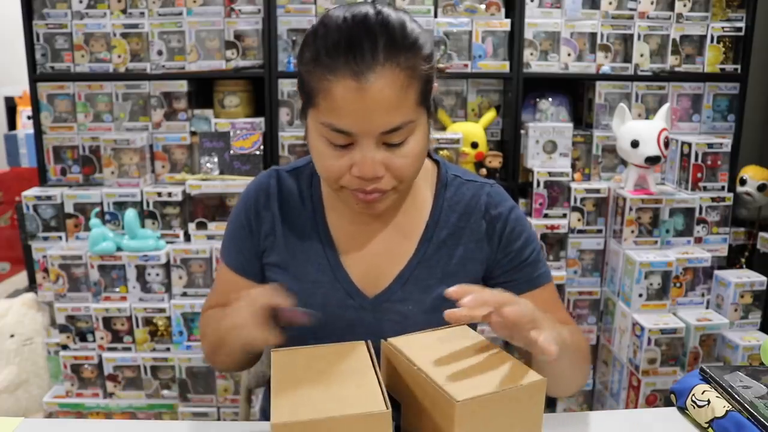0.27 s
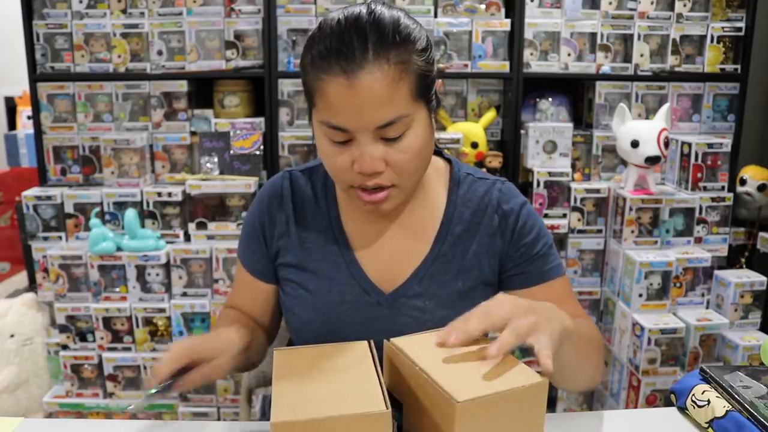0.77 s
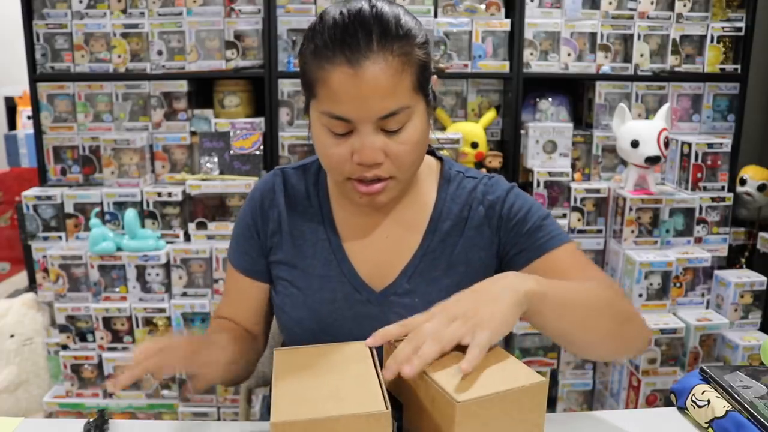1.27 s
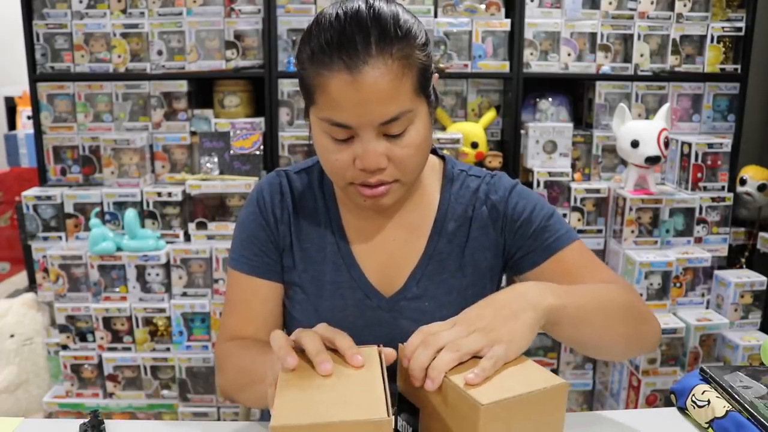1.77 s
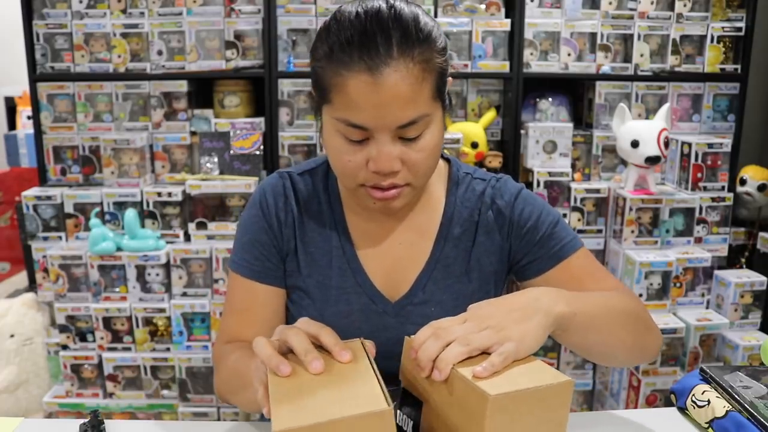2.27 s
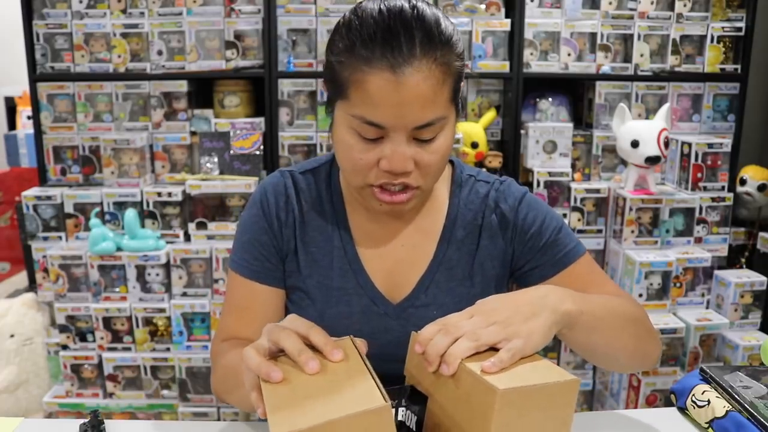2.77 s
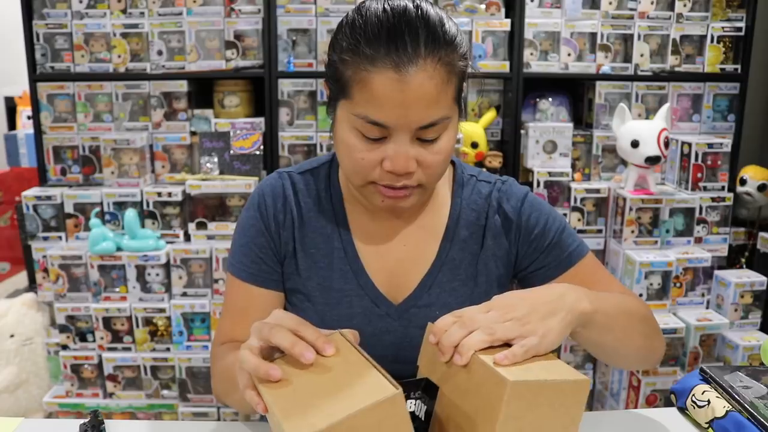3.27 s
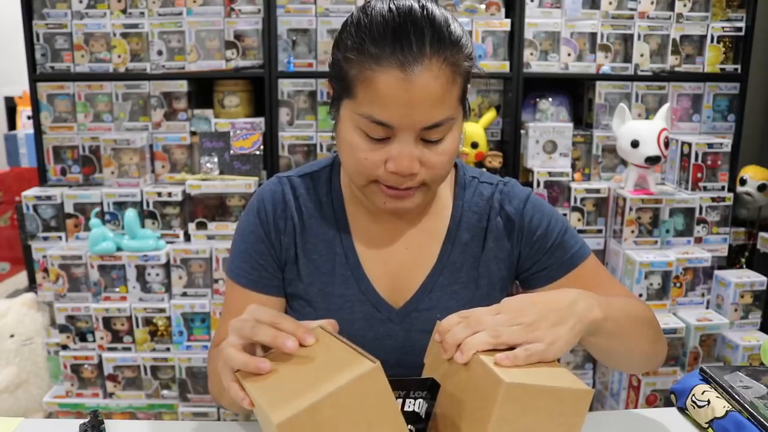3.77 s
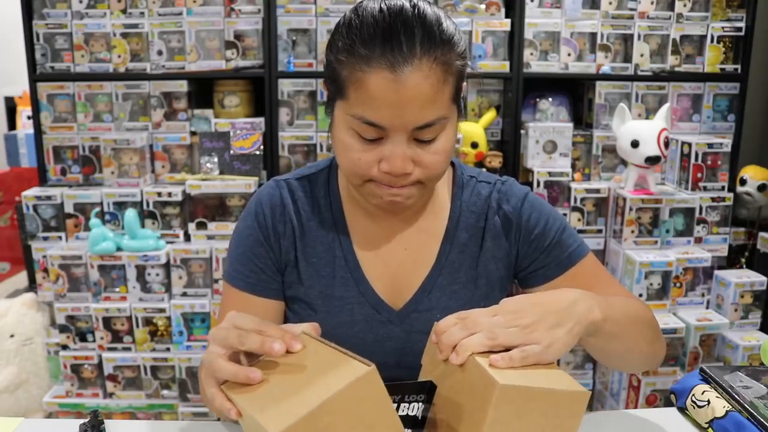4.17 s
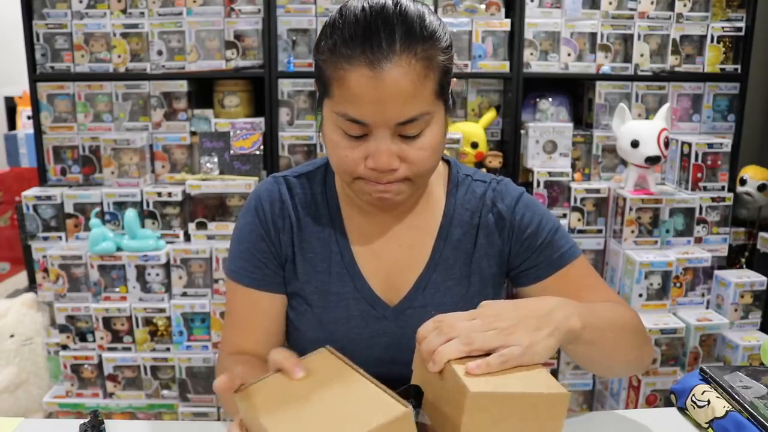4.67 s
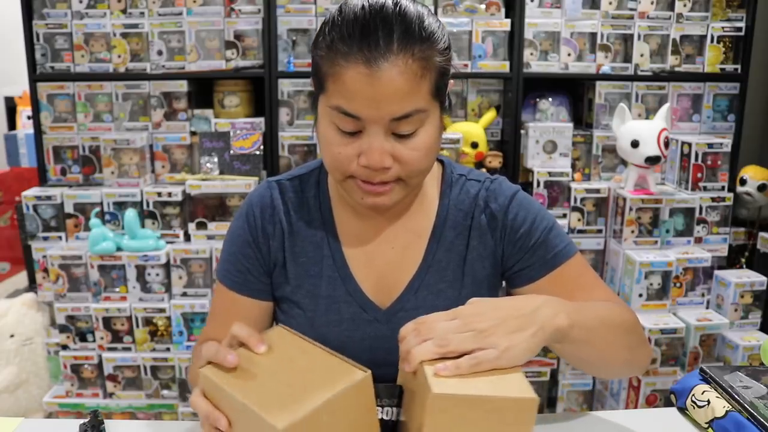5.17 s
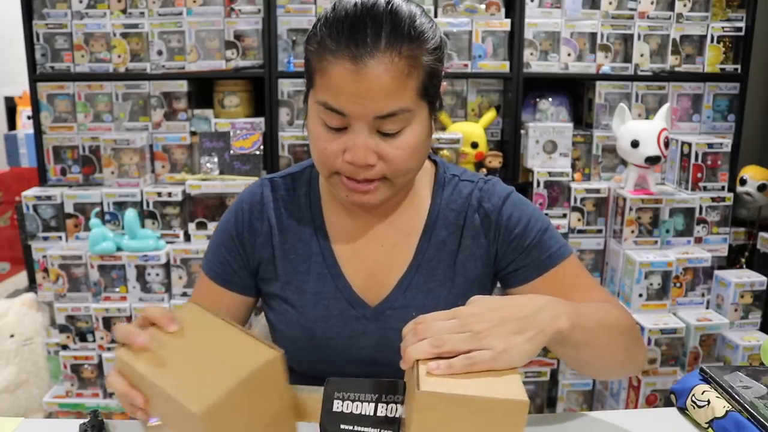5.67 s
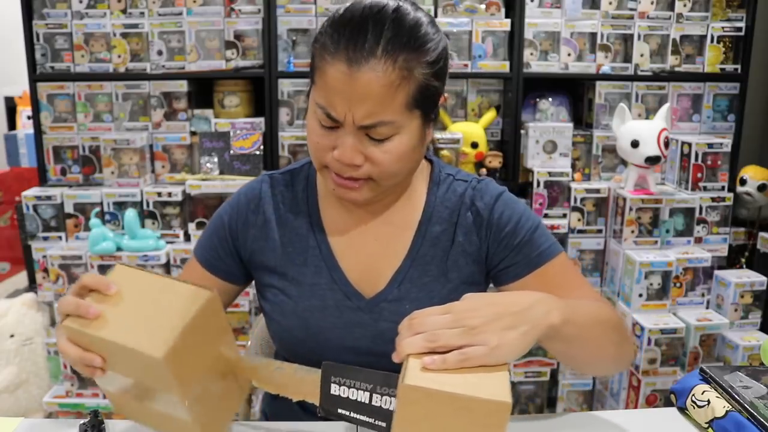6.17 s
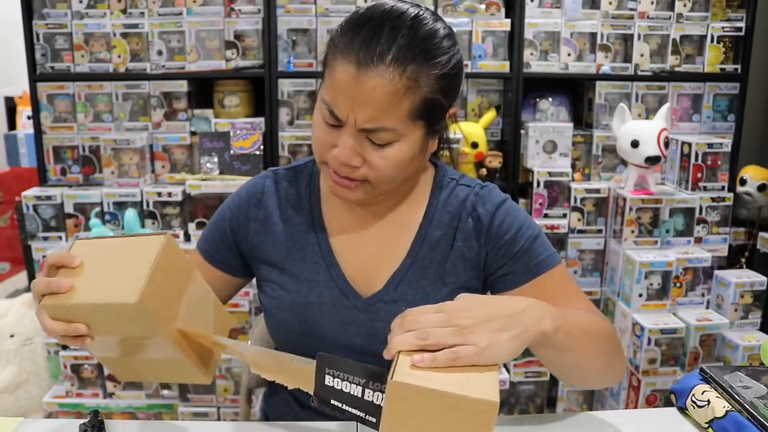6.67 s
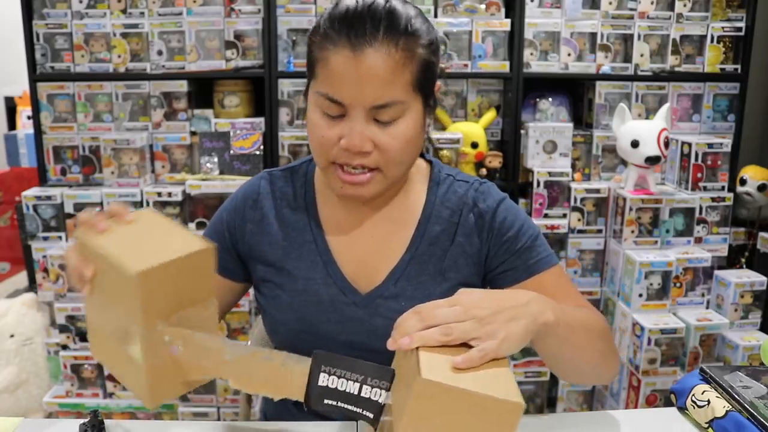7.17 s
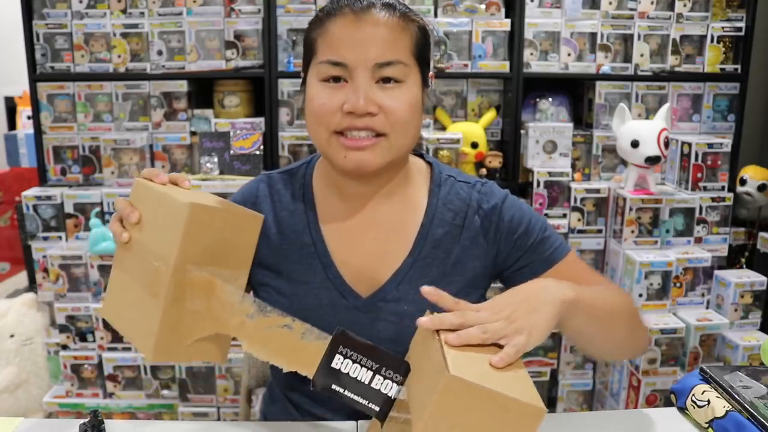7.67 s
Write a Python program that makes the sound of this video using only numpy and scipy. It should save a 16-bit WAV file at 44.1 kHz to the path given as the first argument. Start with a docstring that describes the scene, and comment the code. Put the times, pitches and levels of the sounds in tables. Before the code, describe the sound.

Close, dry indoor sound of taped boxes being separated: quiet touches and taps, a cluster of strong hollow cardboard thumps, a long uneven sticky peel full of bright pops, a short pause with knocks, then a much louder continuous rip of tape and paper fibres. It ends in light scuffs and a small click over low hiss.

```python
"""In a small furnished room, two cardboard boxes are handled on a table and pulled apart.
The packing tape between them peels and tears paper fibres in dense, tiny slips, made as coloured random pulses.
Loud snaps of glue add short twangs with clicks, and brief rasps are tones that wander and swell.
Box knocks are fading sine tones with a crack of noise. One microphone hears it all, with a steady hiss."""
import sys
import numpy as np
from scipy import signal
from scipy.fft import rfft, irfft, next_fast_len
from scipy.io import wavfile
from scipy.ndimage import uniform_filter1d, map_coordinates

SR = 44100
rng = np.random.default_rng(int(sys.argv[2]) if len(sys.argv) > 2 else 0)


def int16_out(signal):
    """Quantize to a 16-bit WAV file."""
    q = np.round(np.clip(np.atleast_2d(signal).T, -1, 1) * 32767)
    wavfile.write(sys.argv[1], SR, q.astype(np.int16))


N = 349713  # length in samples

# how hard the tape peels, in two long pulls: rows of (t/s, tape level/dB)
PULLS = [
    [(1.762, -62), (1.779, -38), (1.866, -39.5), (1.955, -31.5), (2.07, -43.5), (2.28, -27.5), (2.37, -50),
     (2.393, -42), (2.417, -52), (2.43, -41), (2.468, -30), (2.54, -35.5), (2.575, -29.5), (2.65, -33.5),
     (2.73, -37.5), (2.81, -31.5), (2.93, -28.5), (3.08, -35.5), (3.385, -26), (3.45, -28.5), (3.53, -39),
     (3.59, -30), (3.625, -33), (3.74, -28.5), (3.86, -33.5), (4.12, -30.5), (4.17, -32.5), (4.2, -28.5),
     (4.33, -36.5), (4.42, -39), (4.48, -53)],
    [(4.78, -44), (4.83, -35), (4.86, -29), (4.9, -25.5), (4.975, -33), (5.035, -27), (5.125, -42.5),
     (5.18, -30), (5.355, -31), (5.385, -19), (5.43, -18), (5.49, -23), (5.575, -34), (5.655, -23),
     (5.74, -19.5), (5.8, -21.5), (5.91, -21), (5.975, -26), (6.02, -21.5), (6.17, -19), (6.27, -21.5),
     (6.38, -20), (6.43, -24), (6.5, -20.5), (6.55, -35), (6.605, -38), (6.645, -55.5), (6.72, -70),
     (6.92, -86)],
]
# colour of the vibrating tape: (f/Hz, gain/dB)
TAPE_COLOUR = [(700, -45), (1300, -16), (1600, -1), (2600, 0.5), (3500, -1.5), (4200, -0.5), (5500, -3.5),
               (6400, -12), (7500, -16), (11000, -58)]
# colour of the tearing paper fibres: (f/Hz, gain/dB)
FIBRE_COLOUR = [(150, -65), (4000, -22.5), (5800, 4.5), (6800, 7), (8800, 6), (10500, -2), (11800, 2.5),
                (14000, 1.5), (16000, -8.5)]


def amp(db):
    """Turn a level in dB into a gain."""
    return 10 ** (np.asarray(db) / 20)


def unit(x):
    """Scale x to an average strength (rms) of 1."""
    return x / np.sqrt(np.mean(x ** 2) + 1e-20)


def along(points, hz):
    """Read a curve of (f/Hz, value) points at any frequency, on a log axis."""
    point_hz, values = np.transpose(points)
    return np.interp(np.log(hz + 1), np.log(point_hz + 1), values)


def curves(rows):
    """Turn rows of (t/s, values...) into one value per sample for each column after the time."""
    times, *columns = np.transpose(rows)
    return [np.interp(np.arange(N) / SR, times, column) for column in columns]


def wobble(rate):
    """Draw a smooth random curve with this many random points a second."""
    points = rng.standard_normal(int(N * rate / SR) + 4)
    return map_coordinates(points, [np.arange(N) * rate / SR])


def coloured(x, spectrum, size=4096):
    """Filter x to this spectrum without any sound ahead of a pulse, so that every slip starts sharply."""
    gain = amp(along(spectrum, np.fft.rfftfreq(size, 1 / SR)))
    cepstrum = irfft(np.log(gain + 1e-6))
    # folding the second half onto the first gives the filter its sharp start (minimum phase)
    cepstrum[1:size // 2] *= 2
    cepstrum[size // 2 + 1:] = 0
    pulse_response = irfft(np.exp(rfft(cepstrum)))
    return signal.oaconvolve(x, pulse_response)[:N]


def patchy(x, depth_db, bins=4, frames=14, lift_db=0):
    """Vary the gain in random patches of time and frequency: the vibrating area keeps changing."""
    z = signal.stft(x, nperseg=512)[2]
    field = uniform_filter1d(rng.standard_normal(z.shape), int(bins), 0)
    field = uniform_filter1d(field, int(frames), 1)
    patch_gain = amp(depth_db * unit(field) + lift_db)
    return signal.istft(z * patch_gain, nperseg=512)[1][:N]


def slips(rate, spread_db, clump_db, smooth_db):
    """Tiny releases (rate a second) at random moments, a few larger, in clumps, on a smooth rubbing."""
    when = rng.random(N) < rate / SR
    larger = np.minimum(rng.exponential(size=N), 2.8)
    size = amp(spread_db * larger) * rng.standard_normal(N)
    clumps = amp(clump_db * (0.97 * wobble(300) + 0.6 * wobble(90)))
    rubbing = amp(smooth_db) * rng.standard_normal(N)
    return unit(clumps * (unit(when * size) + rubbing))


def background_hiss():
    """Steady noise of the microphone, coloured and set to a fixed level."""
    # colour of the hiss: (f/Hz, relative level/dB)
    hiss_colour = [(24, -52.5), (40, -16), (144, 5.5), (185, 4), (305, -6), (412, -18.5), (1270, -21.5),
                   (5720, -21), (14800, -27.5), (16000, -33.5)]
    hiss_db = -73
    return amp(hiss_db) * unit(coloured(rng.standard_normal(N), hiss_colour))


def room(x):
    """The room answers with a tail of noise in which each frequency dies at its own speed."""
    # how long the room rings: (f/Hz, time to fall by 60 dB/s)
    ring_times = [(150, 0.28), (1000, 0.1), (4000, 0.083), (12000, 0.043)]
    hz, t, z = signal.stft(rng.standard_normal(SR // 2), SR, nperseg=256)
    fade = amp(-60 * t / along(ring_times, hz)[:, None])
    tail = signal.istft(z * fade, SR, nperseg=256)[1]
    delayed = np.pad(x, (250, 0))  # samples before the answer starts
    return signal.fftconvolve(delayed, tail / np.linalg.norm(tail))[:N]


def rasps():
    """One patch of tape or board sings: a tone wanders at random in pitch, swelling and fading."""
    # short rasps: (centre t/s, length/s, level at the centre/dB, tone f/Hz, width before smoothing/Hz)
    rasp_list = [(1.826, .012, -28, 3100, 500), (1.828, .012, -28, 950, 300), (1.945, .06, -32, 2700, 1000),
                 (4.697, .01, -33, 3500, 400), (4.708, .01, -36, 3600, 300), (4.795, .02, -38, 3300, 500),
                 (4.815, .025, -35, 3600, 300), (6.985, .005, -40, 1650, 300),
                 (6.988, .008, -48, 2700, 400), (7.04, .05, -55, 1650, 150), (7.497, .07, -41, 450, 200),
                 (7.715, .025, -36, 330, 150), (7.79, .1, -46, 1080, 200), (7.8, .1, -42, 420, 80),
                 (7.906, .025, -43, 2500, 200)]
    out = np.zeros(N + SR)
    t = np.arange(-SR // 8, SR // 8) / SR
    for centre, length, db, tone_hz, width_hz in rasp_list:
        phase_step = np.sqrt(2 * np.pi * abs(width_hz) / SR)
        wander = np.cumsum(rng.normal(0, phase_step, len(t)))
        wander = uniform_filter1d(wander, size=70)
        swell = np.exp(-4 * (t / length) ** 2)
        tone = np.sin(2 * np.pi * tone_hz * t + wander)
        out[round(centre * SR) - SR // 8:][:len(t)] += amp(db + 3) * swell * tone  # a sine peaks 3 dB above its rms
    return out[:N]


def knocks():
    """Each blow rings the box modes near its struck tone most, with a short crack of the edge on top."""
    # knocks: (t/s, ring level/dB, centre of struck tone f/Hz, crack relative to ring/dB, share of the free ring time)
    blows = [(0.495, -26, 434, -14, 1), (0.539, -25.5, 245, -1, 1), (0.603, -31, 200, -21, 1),
             (0.719, -29, 250, -9.5, 1), (1.064, -40, 710, 0.4, 1.1), (1.186, -15.5, 420, -2.5, 1.1),
             (1.231, -5, 600, -8, .7), (1.243, -5, 280, -27, 1.1), (1.299, -6, 480, -11, .8),
             (1.361, -17.5, 160, -24, 1.3), (1.529, -22, 550, -14, .8), (1.552, -18, 300, -8, 1.1),
             (3.397, -7, 420, -9, .5), (4.38, -18, 300, -2, 1.1), (4.58, -5.5, 320, -11, .7),
             (4.634, -13.5, 1000, -14, 1.3), (4.74, -22, 450, -12, .9), (4.746, -10, 600, 0, .7),
             (4.841, -10, 600, 1, .8), (4.881, -8, 696, -10, .6), (5.13, -13, 450, -14, .9),
             (5.162, -19, 342, -8, .9), (5.29, -21, 400, -10, .9), (5.597, -8.5, 314, -3, .9),
             (7.015, -52, 400, -15, .9), (7.587, -35.5, 331, 6, .9)]
    # ringing modes of a free box: (f/Hz, relative level/dB, time to fall by 60 dB/s)
    box_modes = [(150, 2, 0.09), (235, 4, 0.051), (343, 7.5, 0.033), (396, -3, .04), (522, 4, 0.032),
                 (717, 6.5, .028), (840, 6, 0.024), (970, 13, 0.011), (1200, 6, 0.022), (1550, 6.5, 0.015),
                 (1950, 13.5, 0.02), (3100, -2.5, .015)]
    # colour of the cracking board edge: (f/Hz, gain/dB)
    crack_colour = [(500, -30), (1200, -1.5), (2000, -6.5), (3300, -1), (4400, -17), (8000, -38),
                    (16000, -58)]
    # a small box sends out little deep bass: (f/Hz, gain/dB)
    box_radiation = [(40, -22), (120, 0), (20000, 0)]
    rings, cracks = np.zeros((2, N + SR))
    t = np.arange(SR // 5) / SR
    hz, level, t60 = np.transpose(box_modes)[:, :, None]
    for start, db, tone_hz, crack_db, free in blows:
        here = slice(round(start * SR), round(start * SR) + len(t))
        detune = rng.normal(1, .05, hz.shape)  # the grip shifts the modes
        near_db = -12 * np.abs(np.log2(hz / tone_hz))  # 12 dB weaker per octave away
        uneven_db = rng.normal(0, 1.6, hz.shape)
        strength = amp(level + near_db + uneven_db - 60 * t / (abs(free) * t60))
        ring = np.sum(strength * np.sin(2 * np.pi * hz * detune * t), 0)
        ring = ring * (1 - np.exp(-1.5 * tone_hz * t))  # a dull blow builds slower
        rings[here] += amp(db) * ring / np.abs(ring).max()
        cracks[here] += amp(db + crack_db - 60 * t / .018) * rng.standard_normal(len(t))
    return coloured(rings, box_radiation) + amp(7.5) * coloured(cracks, crack_colour)


def snaps():
    """A big release of glue: a treble click, a burst in the colour of the tape and its short twang."""
    # single loud snaps: (t/s, relative level/dB, twang f/Hz, click relative to the snap/dB)
    snap_list = [(0.248, -47, 2700, -35), (0.4943, -23.5, 2840, -23), (0.5426, -22, 1810, -12),
                 (1.345, -28, 5300, -22), (1.5284, -28, 2930, -36), (1.826, -24, 3200, -5),
                 (1.9006, -21, 4200, -1), (1.9387, -6, 2640, -12), (2.151, -15, 1760, -12),
                 (2.4224, -22, 1730, -10), (2.4548, -16.5, 2200, -21), (2.7087, -17, 1780, -11),
                 (2.9188, -13, 5230, -14.5), (3.057, -15, 5330, -11), (3.1796, -10, 5460, -19),
                 (3.325, -13, 5500, -14), (3.3734, -11, 5040, -14), (3.4176, -5, 4730, -6.5),
                 (3.6347, -10, 4670, -19.5), (3.895, -11, 6000, -32), (3.906, -14, 5900, -20),
                 (3.9444, -9.5, 5880, -21.5), (4.0442, -16, 5930, -18), (4.067, -14, 6000, -15),
                 (4.147, -13, 3000, -16), (4.1659, -12, 1670, -9), (4.1815, -10, 3200, -8),
                 (4.247, -16, 5800, -14), (4.331, -24, 5000, -3), (4.3548, -24, 5000, -1),
                 (4.9916, -7, 2570, -16), (5.5523, -14, 2640, -14), (6.501, -4.5, 5250, -21.5),
                 (6.9837, -33, 5200, -45), (7.5567, -36, 2720, -40), (7.5795, -14, 2950, -40),
                 (7.5887, -21, 2970, -34)]
    twangs, bursts, clicks = np.zeros((3, N + SR))
    t = np.arange(SR // 40) / SR
    for start, db, tone_hz, click_db in snap_list:
        here = slice(round(start * SR), round(start * SR) + len(t))
        clicks[here] += amp(db + click_db - 60 * t / .009) * rng.standard_normal(len(t))
        flutter = np.cumsum(rng.normal(0, 0.11, len(t)))  # the tone is unsteady
        twang = 0.42 * amp(-60 * t / 0.013) * np.sin(2 * np.pi * tone_hz * t + flutter)
        twangs[here] += amp(db) * twang
        bursts[here] += amp(db - 60 * t / 0.0083) * rng.standard_normal(len(t))
    burst_sound = amp(-4.5) * coloured(bursts, TAPE_COLOUR)
    click_sound = amp(1.5) * coloured(clicks, FIBRE_COLOUR)
    return twangs[:N] + burst_sound + click_sound


def stretch_db(width_hz=380):
    """The free length of tape rings as it is stretched: a lift in dB around three moving tones."""
    # the moving tones: (t/s, low f/Hz, lift/dB, middle f/Hz, lift/dB, high f/Hz, lift/dB)
    moving_tones = [(.3, 2300, 3, 3800, 0.5, 5740, 4), (1.6, 1950, 1.5, 3600, 6, 5600, 0.5),
                    (1.8, 3220, 5, 4400, -0.5, 5700, 4), (1.95, 2570, 8, 4400, -6.5, 6000, 1.5),
                    (2.1, 1860, 8, 4500, -8, 5730, 2.5), (2.35, 1830, 8, 3900, 11, 5600, -1.5),
                    (2.55, 2170, 7, 3970, 2.5, 5400, 1.5), (2.85, 1800, 3, 4030, 3, 5270, 9),
                    (3.3, 1700, 5, 4320, 4, 5480, 8), (3.7, 1700, 0.4, 3300, 3, 5600, 4),
                    (3.95, 1700, 1.5, 3150, 2.5, 5900, 12), (4.28, 1700, 1.5, 3020, 2.5, 5700, 4),
                    (4.38, 1800, -2.5, 3100, 3.5, 4900, 13), (4.7, 2100, 6, 3700, 6, 5100, -1.5),
                    (5.2, 2370, 1.5, 3800, 0.4, 5400, 9), (5.6, 2700, 7, 4080, 5, 5400, -1.5),
                    (5.9, 1910, 8, 4600, 4, 5900, 3), (6.2, 2000, 2.5, 4300, 8, 5400, 5),
                    (6.5, 2120, 5, 4300, -1.5, 5510, 4), (7, 1650, 12, 2700, 6.5, 5480, -1.5),
                    (7.3, 1850, 10, 2630, 4.5, 5440, 3), (7.93, 1650, 4, 2670, 4, 5500, 8)]
    hz, t, _ = signal.stft(np.zeros(N), SR, nperseg=512)
    times, *columns = np.transpose(moving_tones)
    columns = [np.interp(t, times, column) for column in columns]
    lift = 0
    for tone, db in zip(columns[::2], columns[1::2]):
        lift = lift + db * np.exp(-((hz[:, None] - tone) / width_hz) ** 2)
    return lift


def efforts():
    """Gains of tape, fibres, walls and flaps: the pulls, and the touches that rise, hold and fall."""
    # how the peeling spreads, relative to the tape at full pull: (t/s, fibres/dB, walls/dB, flaps/dB)
    spread = [(1.76, -3.5, 0.5, -12.5), (1.85, -9.5, -6.5, -10.5), (1.96, -5.5, -9.0, -16.0),
              (2.05, -10.0, 1.5, -11), (2.2, -3.5, -12.0, -8.0), (2.33, -7.0, -1.5, -7.5),
              (2.47, -3.0, -16.5, -9.0), (2.62, -7.5, -15.0, -5.0), (2.75, -6.0, -20.5, -7.5),
              (2.89, -3.5, -7.5, -8.0), (3.15, -3.5, -9.0, -5.0), (3.4, -4.0, -13.0, -5.0),
              (3.53, -12, -1.0, -3.0), (3.7, -8.5, -11.5, -5), (3.85, -10.0, -6.5, -2.5),
              (4.05, -7.5, -12.0, -5.0), (4.2, -7.5, -10, -3.5), (4.32, -7.5, -9.5, -4.5),
              (4.45, -7.5, 2.5, -2.0), (4.8, -9.5, 4.5, -0.5), (4.9, -6.0, -5.0, -8.5),
              (5.05, -5.0, -6.0, -2.0), (5.3, -15.5, -6.5, -5.5), (5.4, -7.0, 1.0, -1.5),
              (5.55, -11.0, -5.0, 1.0), (5.64, -6.0, -1, -4), (5.75, -8.0, 0, -5.5),
              (5.95, -6.0, -5.5, -6.0), (6.05, -4.5, 4.0, -0.5), (6.14, -9.5, -2.5, -7.5),
              (6.25, -9.0, -5.0, -7.0), (6.4, -11.5, -6.5, -5.5), (6.5, -17.5, -7.5, -7.0),
              (6.62, -9.5, -8.5, -5.5), (6.75, -10.5, -7.0, -2.5)]
    # short touches of hands, tape and boxes: (peak t/s, rise/s per 20 dB, hold/s, fall/s per 20 dB,
    # tape level/dB, fibres level/dB, walls level/dB, flaps level/dB)
    touches = [(0, .01, .001, .08, -40, -47, -54, -55), (.06, .08, .001, .13, -70, -80, -55, -57),
               (.2, .1, .05, .3, -70, -84, -80, -73), (.3, .1, .75, .3, -76, -82, -90, -79),
               (.5, .012, .04, .05, -41, -48, -44, -40), (.61, .012, .005, .1, -46, -56, -46, -56),
               (.65, .04, .17, .042, -44, -55, -58, -68), (.737, .055, .03, .06, -44, -46, -40, -49),
               (1.066, .008, .014, .1, -54, -79, -51, -55), (1.119, .045, .005, .08, -45, -72, -62, -49),
               (1.19, .012, .005, .07, -27, -54, -26, -28), (1.253, .05, .003, .035, -29, -52, -34, -31),
               (1.302, .012, .003, .1, -32, -64, -31, -32), (1.37, .1, .04, .1, -52, -75, -31, -42),
               (1.46, .05, .02, .03, -45, -48, -46, -65), (1.552, .011, .03, .085, -31, -39, -31, -34),
               (1.62, .05, .025, .04, -39, -44, -44, -45), (1.695, .03, .01, .06, -75, -85, -48, -72),
               (1.76, .03, .03, .1, -75, -85, -46, -72), (4.555, .15, .1, .06, -49, -52, -52, -50),
               (4.636, .012, .003, .12, -40, -50, -50, -39), (4.693, .06, .003, .05, -48, -55, -33, -38),
               (4.748, .01, .005, .08, -39, -60, -32, -34), (6.99, .01, .003, .3, -61, -95, -75, -72),
               (7.088, .035, .003, .3, -38, -53, -50, -50), (7.142, .06, .03, .05, -40, -50, -30, -39),
               (7.23, .1, .09, .13, -41, -51, -58, -50), (7.33, .1, .08, .09, -47, -70, -47, -60),
               (7.49, .06, .02, .045, -70, -80, -50, -60), (7.582, .006, .003, .06, -41.5, -66, -52, -58),
               (7.61, .03, .003, .2, -60, -75, -45, -58), (7.663, .05, .04, .15, -41, -47, -44, -66),
               (7.722, .04, .003, .1, -46, -56, -43, -58), (7.78, .1, .055, .025, -45, -62, -45, -58),
               (7.9, .025, .003, .07, -44, -48, -75, -80)]
    full_db = -22  # tape level at full pull
    others_grow = 1.1  # dB that fibres and board gain for each dB of pull
    t, power = np.arange(N) / SR, np.zeros((4, N))
    spread_db = curves(spread)
    for rows in PULLS:
        short_db = curves(rows)[0] - full_db  # pull relative to full pull
        layers_db = [short_db] + [others_grow * short_db + db for db in spread_db]
        active = (t > rows[0][0]) * (t < rows[-1][0])
        power += amp(full_db + np.array(layers_db)) ** 2 * active
    for peak, rise, hold, fall, *peak_db in touches:
        near = slice(max(0, round((peak - .3) * SR)), round((peak + hold + .8) * SR))
        before = np.maximum(peak - t[near], 0)
        after = np.maximum(t[near] - peak - hold, 0)
        shape_db = -20 * (before / rise + after / fall)
        power[:, near] += np.outer(amp(peak_db), amp(shape_db)) ** 2
    return np.sqrt(power)


def peel():
    """Glue slips drive tape, fibres and flaps; coarser board slips drive walls and flaps, each in its colour."""
    # colour of the box walls: (f/Hz, relative level/dB)
    wall_colour = [(60, -33), (110, -19), (150, -4), (210, 1.5), (280, -2.5), (420, 3.5), (600, -1),
                   (800, -14), (1500, -50), (4000, -90)]
    # colour of the box flaps: (f/Hz, relative level/dB)
    flap_colour = [(120, -70), (350, -31), (600, 0), (750, 3), (1050, 1.5), (1350, -2.5), (1700, -10.5),
                   (3000, -66.5)]
    on_tape, on_fibres, on_walls, on_flaps = efforts()
    glue = slips(rate=4000, spread_db=3.6, clump_db=1.2, smooth_db=-4)
    hands = slips(rate=5000, spread_db=1.5, clump_db=.8, smooth_db=3)  # hands rub more smoothly
    t = np.arange(N) / SR
    pulling = sum((t > rows[0][0]) & (t < rows[-1][0]) for rows in PULLS)
    glue = np.where(pulling, glue, hands)
    drag = slips(rate=900, spread_db=1.9, clump_db=1.87, smooth_db=-3)  # coarser bumps of board on table
    tape = on_tape * unit(coloured(patchy(glue, depth_db=2.0, lift_db=stretch_db()), TAPE_COLOUR))
    fibres = on_fibres * unit(coloured(patchy(glue, depth_db=3.5), FIBRE_COLOUR))
    flaps = on_flaps * unit(coloured(patchy(glue + 0.46 * drag, depth_db=2.2), flap_colour))
    walls = on_walls * unit(coloured(patchy(drag, depth_db=2.3), wall_colour))
    return tape + fibres + flaps + walls


def scene():
    """Boxes and their room, alike in both channels."""
    boxes = rasps() + knocks() + snaps() + peel()
    return np.tile(boxes + amp(-15) * room(boxes), (2, 1))


def record(dry):
    """The microphone weakens the deep bass, hisses and rounds off peaks; treble above a limit is removed."""
    # bass response of the microphone: (f/Hz, gain/dB)
    low_cut = [(20, -19.5), (50, -21), (80, -15), (105, -6), (135, 0), (20000, -1)]
    top_hz = 15800
    padded = next_fast_len(N + SR // 2)
    heard = np.array([coloured(x, low_cut, size=16384) for x in dry]) + background_hiss()
    heard = heard / (1 + np.abs(heard / .72) ** 4) ** (1 / 4)  # peaks bend towards 0.72
    keep_band = np.fft.rfftfreq(padded, 1 / SR) < top_hz
    return irfft(rfft(heard, padded) * keep_band, padded)[:, :N]


dry = scene()
out = record(dry)
int16_out(out)
```